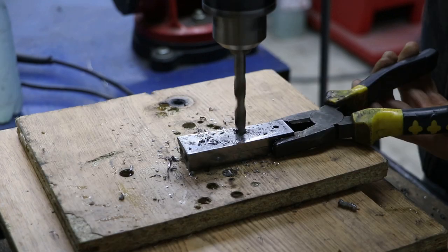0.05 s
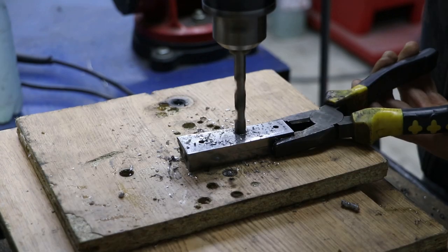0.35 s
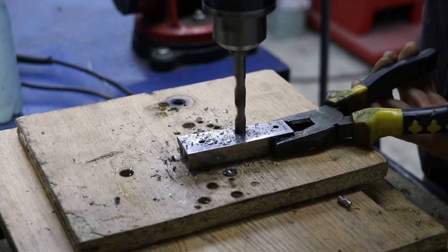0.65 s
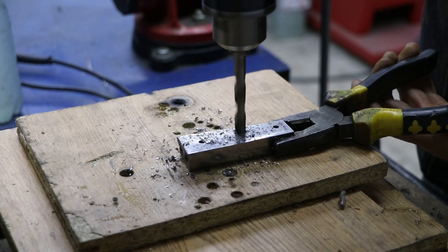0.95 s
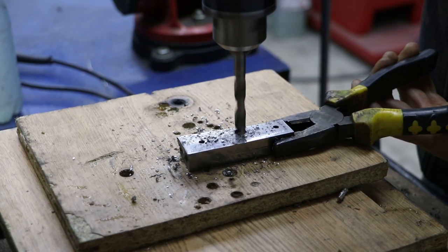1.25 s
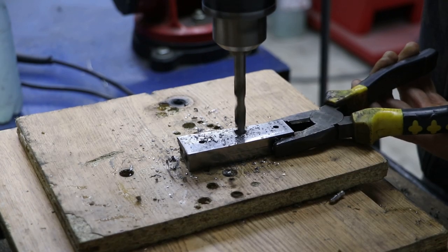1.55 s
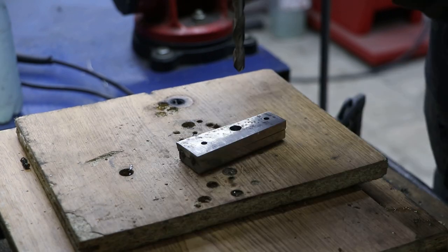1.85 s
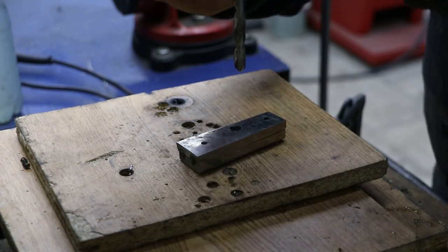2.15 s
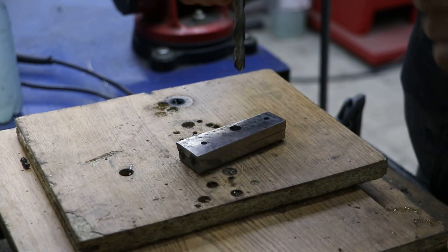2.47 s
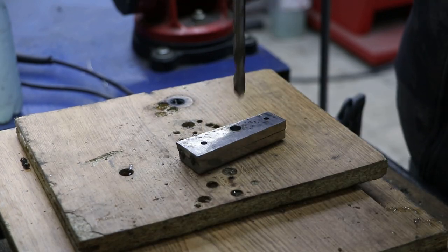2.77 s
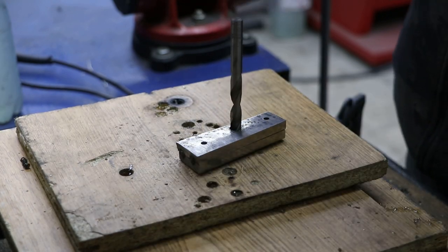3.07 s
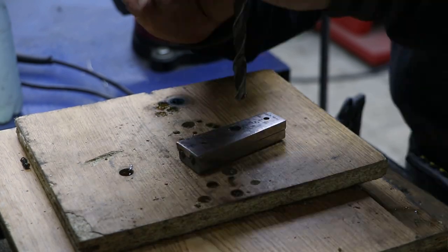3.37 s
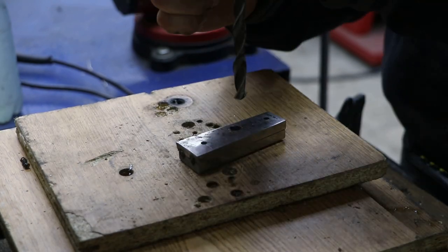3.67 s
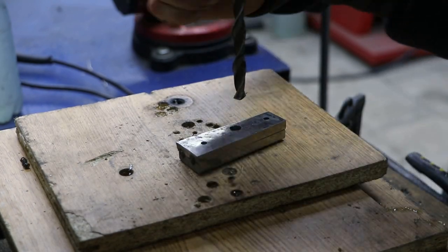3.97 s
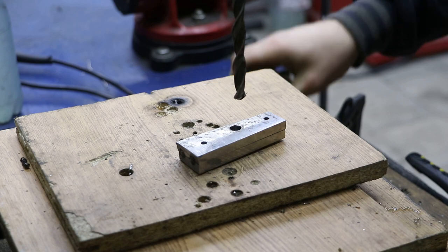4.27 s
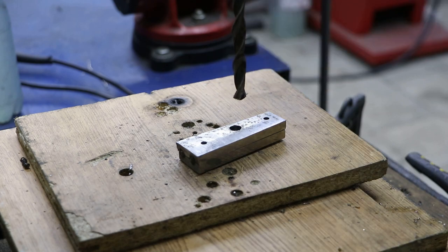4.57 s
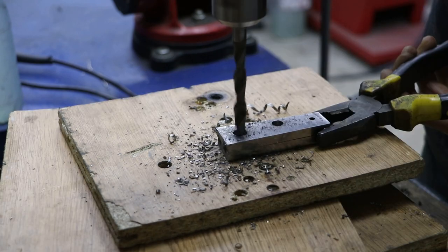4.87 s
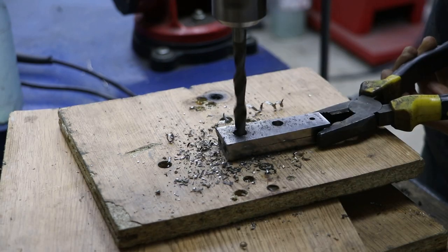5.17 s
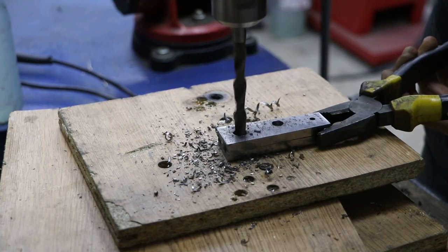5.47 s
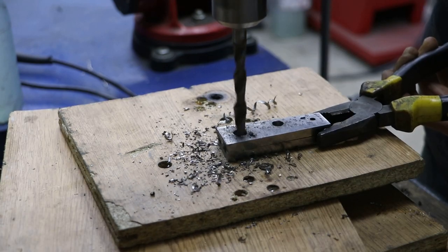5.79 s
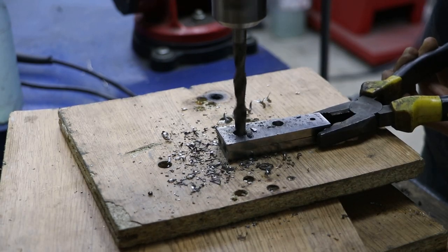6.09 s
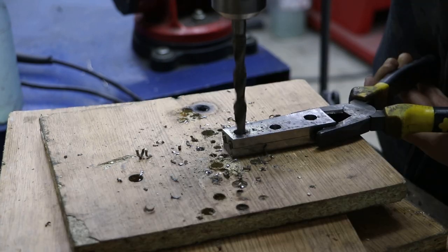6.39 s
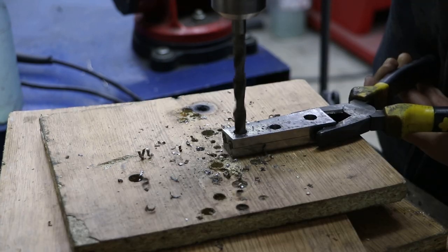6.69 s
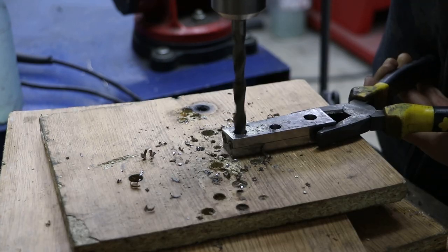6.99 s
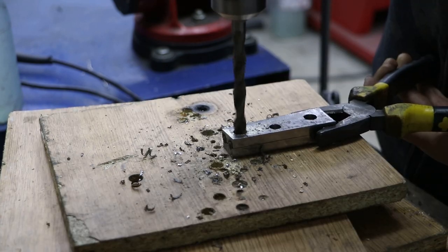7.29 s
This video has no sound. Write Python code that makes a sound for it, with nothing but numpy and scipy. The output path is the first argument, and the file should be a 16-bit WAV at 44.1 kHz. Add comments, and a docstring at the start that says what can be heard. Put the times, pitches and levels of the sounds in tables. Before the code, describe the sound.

A drill bit sings for an instant in a steel bar, then grinds with a rapid pulse as chips crack and ring the metal. During a quiet pause come dull knocks, a light steel rattle, a few clacks and the sharp clink of a dropped chuck key. Two more rasping cuts follow back to back. The sounds are near, in a small workshop with a faint low hum.

```python
"""A small workshop: a bench drill press bores a steel bar held with pliers on a wooden board.
A thin bit sings briefly, then a thick one grinds, throbbing with each turn of the spindle while chips
snap off and ring the bar. In a pause the chuck is loosened, the bit drops and rattles, is refitted, and
the chuck key clinks down, each blow a rough contact plus ringing steel. Two more cuts follow.
Faint room air and a low hum lie underneath."""
import sys
import numpy as np
from scipy import signal
from scipy.fft import rfft, irfft
from scipy.io import wavfile

SR = 44100
rng = np.random.default_rng(int(sys.argv[2]) if len(sys.argv) > 2 else 0)


def put_to_file(sound):
    """Save the sound as 16-bit audio at rate SR, in the file named by the first command-line argument."""
    columns = np.atleast_2d(sound).T  # one column per channel
    safe = np.clip(columns, -1, 1)
    whole_steps = np.round(safe * 32767)
    wavfile.write(sys.argv[1], SR, whole_steps.astype(np.int16))


N = 323914
T = np.arange(N) / SR


def from_db(db):
    """Decibels to gain."""
    return 10 ** (np.asarray(db) / 20)


def rms_one(x):
    """Scale to unit rms."""
    return x / np.sqrt(np.mean(x ** 2) + 1e-20)


def drift(t, rate):
    """A random wander of unit rms, with `rate` turning points a second."""
    knots = rng.standard_normal(400)
    return rms_one(np.interp((t - t[0]) * rate, np.arange(len(knots)), knots, period=len(knots)))


def convolve(x, response):
    """Filter every channel of x, keeping its length."""
    return signal.oaconvolve(np.atleast_2d(x), np.atleast_2d(response), axes=1)[:, :x.shape[-1]]


def colour(x, spectrum, size=2048):
    """Minimum-phase EQ of unit power, drawn through (frequency [Hz], relative level [dB]) points."""
    hz, db = np.transpose(spectrum)
    grid = np.maximum(np.fft.rfftfreq(size, 1 / SR), 1)
    cepstrum = irfft(np.log(from_db(np.interp(np.log(grid), np.log(hz), db))))
    cepstrum[1:size // 2] *= 2
    cepstrum[size // 2 + 1:] = 0
    response = irfft(np.exp(rfft(cepstrum)))
    return convolve(x, response / np.linalg.norm(response))


def resonate(x, resonances, size=4096):
    """A bank of damped resonators, of unit power together."""
    t = T[:size]
    response = sum((-1) ** k * from_db(db) * width * np.exp(-np.pi * width * t)
                   * np.cos(2 * np.pi * hz * t) for k, (hz, width, db) in enumerate(resonances))
    return convolve(x, response / np.linalg.norm(response))


def grains(t, per_s, spread_db):
    """Random clicks of uneven size, at unit rms."""
    sizes = from_db(spread_db * np.minimum(rng.exponential(1, len(t)), 4))
    return rms_one(sizes * rng.choice([-1, 1], len(t)) * (rng.random(len(t)) < per_s / SR))


def contact(t, s, decay_s, size=4096):
    """A dying burst of tiny impacts at time s, with the energy of 5 ms at unit level."""
    burst = rng.standard_normal(size) * np.exp(-T[:size] / decay_s)
    burst *= np.sqrt(.005 * SR) / np.linalg.norm(burst)
    out, at = np.zeros(len(t) + size), np.searchsorted(t, s)
    out[at:at + size] = burst
    return out[:len(t)]


def panned(x, pan_db):
    """Left louder than right by pan_db."""
    return x * from_db(np.array([[.5], [-.5]]) * pan_db)


# Stereo width of reflections, narrow in the bass: (frequency [Hz], relative side level [dB])
SIDE_EQ = [(100, -20), (300, -7.5), (700, -3.5), (2000, 0), (15000, 0.5)]

def scatter(x):
    """Every tiny impact radiates in a direction of its own; mono in, stereo out."""
    return x + .54 * colour(x * rng.standard_normal(len(x)), SIDE_EQ) * np.array([[1], [-1]])


def workshop(x, near_db, far_db, near_t60=.061, far_t60=.76, size=22050):
    """Direct sound, quick reflections from board and machine, and the tail of the room."""
    t = T[:size]
    fade = 0
    for db, t60, delay_s in ((near_db, near_t60, .0006), (far_db, far_t60, .007)):
        power = from_db(-60 * t / t60) ** 2 * (t > delay_s)
        fade = fade + from_db(db) ** 2 * power / power.sum()
    mid, side = rng.standard_normal((2, size)) * np.sqrt(fade / 2)
    mid[0] = 1  # direct sound
    return convolve(x, (mid + colour(side, SIDE_EQ) * np.array([[1], [-1]])) / np.linalg.norm(mid))


def chirps(t, force, resonances, per_s, spread_db):
    """Sparse slips catch each resonance at moments of its own, so it sings in short chirps."""
    shares = np.array([from_db(db) * np.sqrt(width) for hz, width, db in resonances])
    return sum(share * resonate(scatter(force * grains(t, per_s, spread_db)), [resonance])
               for share, resonance in zip(shares / np.linalg.norm(shares), resonances))


# Accents, the few big chips: (time [s], bar ring level [dB], crack level [dB])
BIG_CHIPS = [(0.5577, -42, -52), (1.292, -37, -48), (1.3648, -37, -56), (1.4443, -41.5, -47.5),
             (1.592, -40.5, -49), (4.68, -40, -45), (4.8677, -34, -49), (5.0224, -40, -43.5),
             (5.232, -34, -45.5), (5.3335, -35.5, -49), (5.379, -37.5, -50), (5.4977, -37, -60),
             (5.534, -35.5, -46.5), (6.564, -35, -39.5), (6.7106, -34, -41), (6.7329, -37.5, -46),
             (7.0179, -32, -36.5), (7.203, -39, -44)]

def shed_chips(t, cut, feed, chipping, turn_count=24, second_chip_db=-4.5, spread_db=2):
    """Each turn sheds a chip near the bite, then a smaller one; returns cracks and kicks to the bar."""
    start, end, spindle_hz, bite_s = cut[:4]
    lead_s, gap_s, jitter_s, ring_db, crack_db, decay_s = chipping
    turns = bite_s - lead_s + np.arange(-1, turn_count) / spindle_hz
    times = np.concatenate([turns, turns + gap_s])
    late, ring_luck, crack_luck = np.clip(rng.standard_normal((len(times), 3)), -2, 2).T
    db = np.interp(times, *np.transpose(feed)) + np.repeat([0, second_chip_db], len(turns))
    chips = list(zip(times + jitter_s * late,
                     db + ring_db + spread_db * ring_luck,
                     db + crack_db + spread_db * crack_luck))
    cracks, kicks = np.zeros((2, len(t)))
    for s, kick_db, snap_db in chips + BIG_CHIPS:
        if start < s < end:
            cracks += from_db(snap_db) * contact(t, s, decay_s)
            kicks += from_db(kick_db) * contact(t, s + .001, decay_s=.0035)
    return cracks, kicks


# Bright snap of a breaking chip: (frequency [Hz], relative level [dB])
CRACK_EQ = [(60, -69), (1000, -36), (3500, 4.5), (5000, 0.5), (7000, 5), (11000, -4.5), (15500, -20)]
# Column, table and belt cover, shaken by the drive: (frequency [Hz], width [Hz], relative level [dB])
FRAME_MODES = [(102.6, 3.9, -13.5), (157.5, 9.8, -12), (202, 12.7, -2.5), (241.4, 21.8, 3), (266, 21, 1),
               (344.5, 14, -2.5), (386, 30, 0.5), (417, 32, 0.5), (514.7, 9.6, 1), (704, 33, -1.5)]

def cutting(t, cut, feed, chipping, squeak, scrape_eq, rings):
    """The lips bite harder once a turn and judder; tearing metal hisses, slips and chips ring the bar."""
    spindle_hz, bite_s, throb_db, judder_hz, judder_s, judder_db, frame_db, scrape_db, ring_db = cut[2:-1]
    grab = 1.8  # how abruptly the lips catch and let go; small is a smooth swell
    turn = np.tanh(grab * np.cos(2 * np.pi * spindle_hz * (t - bite_s))) / np.tanh(grab)
    judder = np.cos(2 * np.pi * judder_hz * (t - judder_s))
    bite = rms_one(from_db(throb_db * turn + judder_db * judder + drift(t, rate=99)))
    pressure = from_db(np.interp(t, *np.transpose(feed)))
    cracks, kicks = shed_chips(t, cut, feed, chipping)
    snaps = colour(scatter(cracks), CRACK_EQ) + resonate(scatter(kicks), rings)
    # the flanks rub steadily and dully; the treble follows the bite of the lips
    rub = from_db(scrape_db) * pressure * grains(t, per_s=9000, spread_db=3.5)
    flanks = 2.38 * signal.lfilter(*signal.butter(1, 600, fs=SR), rub * (1 - bite))
    tearing = rub * bite + flanks + from_db(-7) * kicks
    singing = chirps(t, from_db(ring_db) * pressure * bite, rings, per_s=150, spread_db=1.54)
    # small flakes break off, each with a short pitch of its own
    flakes = [(hz, 700, -9 * np.log2(hz / 3700)) for hz in np.geomspace(3700, 11000, num=7)]
    crackle = chirps(t, from_db(-22) * pressure * bite, flakes, per_s=49, spread_db=5.5)
    squeaks = chirps(t, from_db(squeak[2]) * pressure, [squeak], per_s=30, spread_db=4)
    frame = from_db(frame_db) * resonate(rng.standard_normal(len(t)) * from_db(turn), FRAME_MODES)
    scrape = colour(scatter(tearing), scrape_eq)
    return scrape + singing + snaps + crackle + squeaks + panned(frame, pan_db=3)


# The four cuts: (start [s], end [s], spindle rate [Hz], first bite [s], throb depth [dB],
# judder rate [Hz], first judder [s], judder depth [dB], frame level [dB], scrape over feed [dB],
# ring over feed [dB], pan left [dB])
CUT_CUES = [(-.02, 0.11, 20, 0.044, -0.5, 104.3, .01, 2, -89, -4, 0, .2),
            (.112, 1.712, 13.56, .1301, 3.3, 93.4, .1114, 2.2, -52.5, -5.2, -6.5, .5),
            (4.642, 6.186, 13.09, 4.716, 4, 104.8, 4.6418, 4.5, -53, -7.5, -5.5, -.65),
            (6.192, 7.39, 14, 6.4, 1, 77.2, 6.201, 0.5, -56.5, -7, -6.5, -0.5)]
# Feed pressure, one envelope per cut: (time [s], level [dB])
FEED_ENVELOPES = [
    [(0, -47), (.09, -47)],
    [(0.13, -37), (0.5, -42.4), (0.59, -41), (0.71, -41.5), (1.01, -39), (1.25, -44), (1.34, -41.5),
     (1.7, -41)],
    [(4.66, -40.5), (4.9, -39), (4.99, -41.5), (5.07, -38.5), (5.17, -41), (5.37, -39.5), (6.18, -43)],
    [(6.2, -39.5), (6.7, -38), (7.01, -39.5), (7.11, -41), (7.23, -38.5), (7.33, -40)],
]
# Chip rhythm, one row per cut: (lead on the bite [s], gap to second chip [s], jitter [s],
# bar ring over feed [dB], crack over feed [dB], crack decay [s])
CHIP_RHYTHMS = [(.01, 0.011, 0.0061, -12, -9, .0025), (.015, .019, .004, -1.5, -9, 0.008),
                (.002, .036, .008, 1, -11.5, 0.0014), (.006, .02, .006, -2.5, -12.5, 0.0025)]
# Swarf squeaking in the flutes, one row per cut: (frequency [Hz], width [Hz], level over feed [dB])
SWARF_SQUEAKS = [(6850, 200, -14), (10470, 710, -24), (6430, 210, -21.5), (6800, 360, -24.5)]
# Scrape of the cutting lips, one curve per cut: (frequency [Hz], relative level [dB])
SCRAPE_EQS = [
    [(60, -48), (300, -34), (780, -30), (1100, 9), (1550, -2.5), (2100, 8), (4500, 4.5), (9000, -1),
     (11000, 0), (15500, -11)],
    [(40, -33), (150, -28), (400, -7.5), (750, 0.5), (1350, 0), (1700, -7.5), (2200, -3), (2450, -1),
     (4000, -3), (4900, -15), (6400, -16), (10500, -17), (12000, -38), (15500, -44)],
    [(40, -36), (150, -21), (400, -2.5), (750, 5), (1500, 6.5), (2100, 3), (2800, 5.5), (3700, -0.5),
     (4500, -28), (6500, -6), (8000, -19), (11000, -12), (15500, -39)],
    [(40, -38), (150, -37), (400, -2), (800, -0.5), (1500, 4), (2900, 2.5), (3300, -5), (4400, -10),
     (6500, -13), (8200, -16), (9500, -34.5), (12500, -32), (15500, -39)],
]
# Ring of bit and bar, one set per hole and grip: (frequency [Hz], width [Hz], relative level [dB])
BAR_MODES = [
    [(997, 6.9, -6), (2550, 20, -4), (4200, 44, -8), (4400, 49, -5), (6630, 110, -7), (7040, 110, -3),
     (10300, 250, -17)],
    [(1252, 21.5, 1), (1354, 50, 2), (868, 190, -6.5), (2470, 51, -18), (6270, 240, -21)],
    [(1349, 36, -1), (1760, 140, -6), (2446, 62, 4), (2607, 134, -1.5), (3780, 91, -10), (6530, 190, -20)],
    [(1327, 92, -6.5), (2132, 95, 3.5), (2367, 110, -3.5), (2834, 102, 4), (7000, 320, -21.5)],
]

def drill():
    """Four cuts in the room, each starting and stopping abruptly, each with its own pan."""
    out = np.zeros((2, N))
    for cut, *parts in zip(CUT_CUES, FEED_ENVELOPES, CHIP_RHYTHMS, SWARF_SQUEAKS, SCRAPE_EQS, BAR_MODES):
        start, end, *_, pan_db = cut
        span = (T > start - .1) & (T < end + .1)
        t = T[span]
        gate = np.clip((t - start) / .024 + .5, 0, 1) * np.clip((end - t) / .008 + .5, 0, 1)
        sound = workshop(cutting(t, cut, *parts), near_db=-5.5, far_db=-7, near_t60=.025, far_t60=.38)
        out[:, span] += gate * panned(sound, pan_db)
    return out


# A bit bites the bar or slides in the jaws: (start [s], end [s], pitch [Hz], level before swell [dB])
SQUEAL_CUES = [(2.812, 2.886, 14562, -46.5), (2.816, 2.9, 9440, -52), (2.75, 2.87, 5460, -55),
               (-.02, .075, 1001, -49), (-.02, .075, 2570, -47)]

def bit_squeal():
    """Friction holds a mode of the bit singing, louder until it comes free."""
    out = np.zeros(N)
    for start, end, hz, db in SQUEAL_CUES:
        swell = np.interp(T, [start, start + .004, end, end + .03], [0, .27, .55, 0])
        out += from_db(db + 2 * drift(T, rate=36)) * swell * np.sin(2 * np.pi * hz * T)
    return out


# Air of the quiet workshop: (frequency [Hz], relative level [dB])
AIR_EQ = [(20, -22), (45, -7), (90, -8), (220, -7.5), (400, -7.5), (600, -12.5), (2300, -18.5),
          (4600, -26.5), (10000, -27), (14000, -31.5), (15800, -29)]
# Low hums that come and go: (start [s], end [s], pitch [Hz], level [dB])
HUM_CUES = [(1.715, 3.397, 61.6, -78), (3.412, 4.629, 119.8, -77), (4.663, 6.19, 102, -74.5)]

def room_tone():
    """A bed of faint air noise and wavering hum."""
    white = rng.standard_normal((3, N))
    bed = from_db(-74.5) * colour(white[0] + .93 * white[1:], AIR_EQ)
    for start, end, hz, db in HUM_CUES:
        level = from_db(db + 1.9 * drift(T, rate=16)) * (T > start) * (T < end)
        bed += level * np.sqrt(2) * np.sin(2 * np.pi * hz * T + 1.3 * drift(T, rate=25))
    return bed


def ringing(t, hz, db, t60, lag_s=1.25e-5):
    """A dying partial of struck steel, reaching left and right slightly apart."""
    return from_db(db - 60 * t / t60) * np.sin(2 * np.pi * hz * (t - lag_s * np.array([[.5], [-.5]])))


# Glints during the bit change: (time [s], pitch [Hz], level [dB], t60 [s])
PING_CUES = [(2.081, 4620, -64, .15), (2.285, 2235, -54, 0.12), (2.298, 8300, -58, .09),
             (2.690, 7700, -40, .044), (2.69, 5420, -38, 0.042), (2.779, 8350, -44, 0.049),
             (2.886, 2560, -41, .08), (2.886, 4950, -33.5, 0.036), (3.654, 4560, -50, .25),
             (4.033, 2650, -61, .3), (4.320, 3036, -39, 0.16), (4.321, 5500, -54, 0.32)]

def steel_pings(size=22050):
    """Light contacts each make one steel part ring with a single clear partial."""
    out = np.zeros((2, N))
    for s, hz, db, t60 in PING_CUES:
        at = round(s * SR)
        out[:, at:at + size] += ringing(T[:size], hz, db, t60)
    return out


def struck_steel(hits, knock_eq, modes, bounce_s, bounce_db, far_db, far_t60, pan_db=0, size=22050):
    """Each blow is a rough contact with its own brightness, a soft rebound, and freely ringing steel."""
    rough, bright, clicks = np.zeros((3, N))
    for s, db, ring_db, decay_s, treble_db in hits:
        burst = from_db(db) * contact(T, s, decay_s)
        rough += burst + from_db(db + bounce_db) * contact(T, s + bounce_s, decay_s)
        bright += from_db(treble_db) * burst
        clicks[round(s * SR)] = from_db(ring_db)
    shelved = bright + signal.lfilter(*signal.butter(1, 3000, fs=SR), rough - bright)  # treble shelf
    knocks = workshop(colour(scatter(shelved), knock_eq), near_db=3.5, far_db=far_db, far_t60=far_t60)
    rings = convolve(clicks, sum(ringing(T[:size], *mode) for mode in modes))
    # a high-pass keeps the start of each ring free of low thumps
    rings = signal.sosfilt(signal.butter(2, 190, "high", fs=SR, output="sos"), rings)
    # the ringing also goes through the room, whose reflections and tail draw it out as it dies
    return panned(knocks + workshop(rings, near_db=-21, far_db=-15, far_t60=far_t60), pan_db)


# Blows on the drill head: (time [s], contact [dB], ring [dB], contact decay [s], treble shelf [dB])
HEAD_HITS = [(2.088, -58, -58, 0.0083, 5), (2.113, -47, -51, 0.0076, -23), (2.168, -48, -60, .0073, -21),
             (2.221, -42, -72, .018, -11), (2.286, -52, -80, 0.0076, -1), (2.299, -50.5, -66, 0.0032, 8.5)]
# Their dull knock: (frequency [Hz], relative level [dB])
HEAD_EQ = [(88, -66), (150, -26), (250, -7.5), (395, -1), (545, -10), (2310, -17), (4480, -32), (4840, -36),
           (8230, -29.5), (14000, -55)]
# Low ring of the head: (frequency [Hz], level [dB], t60 [s])
HEAD_RING = [(265, 3.5, 0.26), (341, -4, 0.6), (386, -3, 0.46), (466.7, -21, 0.18), (1305, -9, .15),
             (2160, -35, 0.22)]

def chuck_loosening():
    """Loosening the chuck knocks the drill head and sets it ringing."""
    return struck_steel(HEAD_HITS, HEAD_EQ, HEAD_RING,
                        bounce_s=.02, bounce_db=-6, far_db=-1.5, far_t60=.51, pan_db=1)


# Rattle of the bit: (time [s], contact [dB], ring [dB], contact decay [s], treble shelf [dB])
BIT_HITS = [(2.608, -48, -72, 0.0049, 1.5), (2.668, -46.5, -75, 0.006, -6), (2.681, -46.5, -65, .005, 11),
            (2.690, -45.5, -69, 0.0035, 0), (2.733, -48.5, -65, 0.0053, 15), (2.746, -38.5, -49, 0.0014, 8),
            (2.779, -43, -69, 0.0058, -11), (2.886, -46, -43, 0.0045, -4), (2.901, -50, -44.5, 0.0067, -1),
            (2.935, -43, -47.5, 0.0077, 1.5), (3.047, -50.5, -70, 0.002, -17), (3.184, -67, -67, 0.0053, 3),
            (3.249, -74, -69, .003, 8)]
# Its clatter: (frequency [Hz], relative level [dB])
BIT_EQ = [(100, -38), (160, -14.5), (250, 8), (550, 1.5), (900, -2.5), (1300, 3.5), (2000, -4.5),
          (3300, -3), (4500, -11), (5400, -1), (6500, -11), (8400, -9), (12500, -28), (15000, -40)]
# Its ring: (frequency [Hz], level [dB], t60 [s])
BIT_RING = [(209, -26, 0.66), (376, -13, 0.84), (1218, -16.5, 0.92), (3530, -22, 0.064), (5450, -9, 0.15),
            (5520, -12, 0.16), (5530, -6, 0.045), (7820, -1, 0.15), (7790, -10, 0.097), (9600, 2.5, 0.073),
            (11540, -8, 0.11), (14562, -14, 0.2)]

def bit_dropping():
    """The freed bit drops, rattles in the jaws and settles."""
    return struck_steel(BIT_HITS, BIT_EQ, BIT_RING, bounce_s=.018, bounce_db=-6.5, far_db=3, far_t60=.44)


# Knocks in the chuck: (time [s], contact [dB], ring [dB], contact decay [s], treble shelf [dB])
CHUCK_HITS = [(3.413, -44.5, -78, 0.017, -19), (3.654, -39.5, -46, .007, 5.5),
              (3.762, -45, -57, 0.0042, 2.5), (3.965, -56.5, -75.5, .0031, -9),
              (4.565, -40, -66, 0.0036, -3)]
# Their midrange clack: (frequency [Hz], relative level [dB])
CHUCK_EQ = [(120, -76), (200, -41), (515, -5), (769, 1.5), (1150, -14), (1430, -8), (2290, -15),
            (2650, -10.5), (3480, -24), (4580, -15.5), (6710, -26), (15500, -39.5)]
# Ring of the chuck: (frequency [Hz], level [dB], t60 [s])
CHUCK_RING = [(613, -4, 0.25), (784, -10.5, 0.34), (997, -5, 0.14), (1890, -7.5, 0.24), (4460, 4.5, 0.07),
              (4840, -22, 0.18), (8800, -15, 0.094)]

def bit_refitting():
    """The bit knocks against the chuck as it goes back in."""
    return struck_steel(CHUCK_HITS, CHUCK_EQ, CHUCK_RING,
                        bounce_s=.01, bounce_db=-11, far_db=1, far_t60=.3, pan_db=1)


def chuck_sleeve(start=3.46, end=3.65):
    """The sleeve is spun shut by hand and ticks faintly on its thread."""
    ticks = from_db(-69) * grains(T, per_s=120, spread_db=3.5) * (T > start) * (T < end)
    tick_eq = [(500, -3), (2000, -5.5), (2700, -2.5), (7000, -9.5), (9500, -19), (15000, -16)]
    return workshop(colour(scatter(ticks), tick_eq), near_db=4, far_db=4)


# Clinks of the key: (time [s], contact [dB], ring [dB], contact decay [s], treble shelf [dB])
KEY_CLINKS = [(4.050, -43, -55, 0.0015, -4.7), (4.279, -29.5, -41, 0.0033, 6),
              (4.309, -23, -37, 0.011, -2.5), (4.320, -23, -23.5, .0086, -11),
              (4.400, -37, -38, 0.0018, 3.5)]
# Their bright attack: (frequency [Hz], relative level [dB])
KEY_EQ = [(40, -63), (120, -48), (250, -27), (600, -10.5), (1800, -6.5), (3200, 1), (4500, -0.5), (6200, 5),
          (7500, 0), (8300, -7.5), (12000, -8), (15500, -15)]
# High ring of the key: (frequency [Hz], level [dB], t60 [s])
KEY_RING = [(1808, -16.5, 0.15), (2465, -21, 0.19), (3000, -11.5, 0.2), (5500, -31, .25),
            (6040, -31, 0.217), (7100, -36, .3), (7460, -42, .5), (13245, -12, 0.19), (13280, 5.5, 0.17)]

def chuck_key():
    """The key is pulled out, then dropped on the bench, where it bounces and rings."""
    return struck_steel(KEY_CLINKS, KEY_EQ, KEY_RING,
                        bounce_s=.019, bounce_db=-7.5, far_db=-.5, far_t60=.28)


def scene():
    """Drilling over room tone, with the bit change in the pause."""
    drilling = drill() + bit_squeal()
    bed = room_tone()
    bit_out = steel_pings() + chuck_loosening() + bit_dropping()
    bit_in = bit_refitting() + chuck_sleeve() + chuck_key()
    return drilling + bed + bit_out + bit_in


def record(dry):
    """A steep low-pass takes off the very top of the mix."""
    cutoff_hz = 15900
    return signal.sosfilt(signal.ellip(10, .1, 80, cutoff_hz, fs=SR, output="sos"), dry)


dry = scene()
out = record(dry)
put_to_file(out)
```